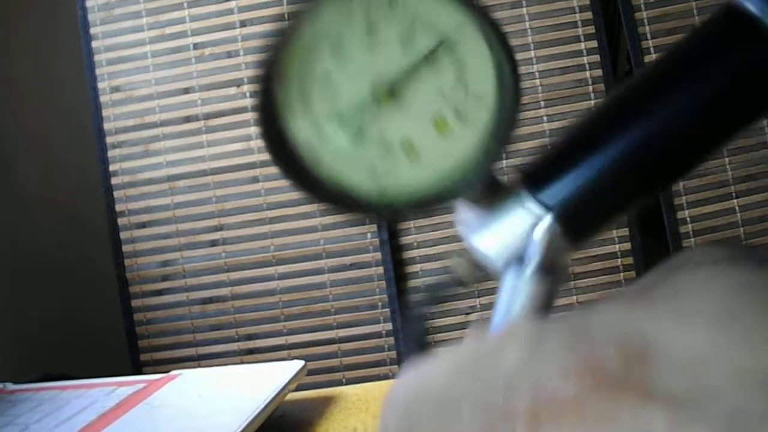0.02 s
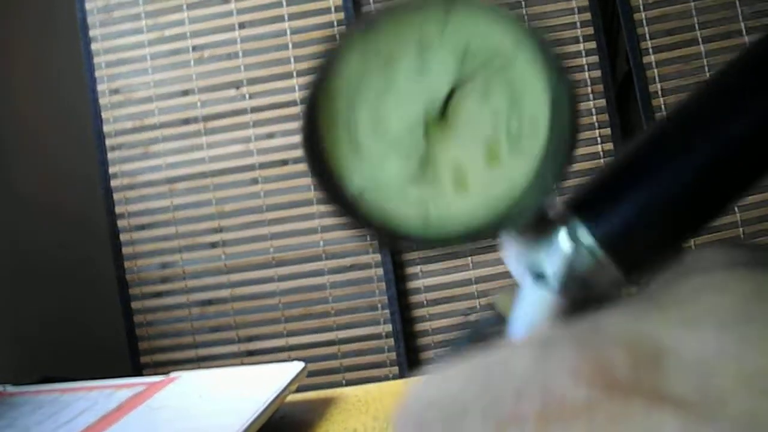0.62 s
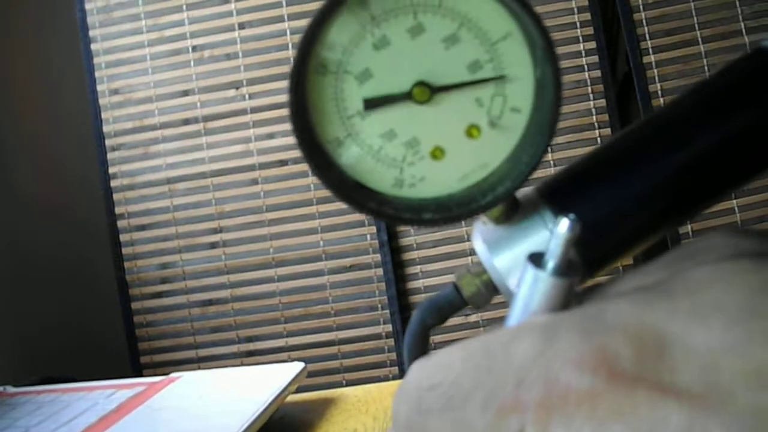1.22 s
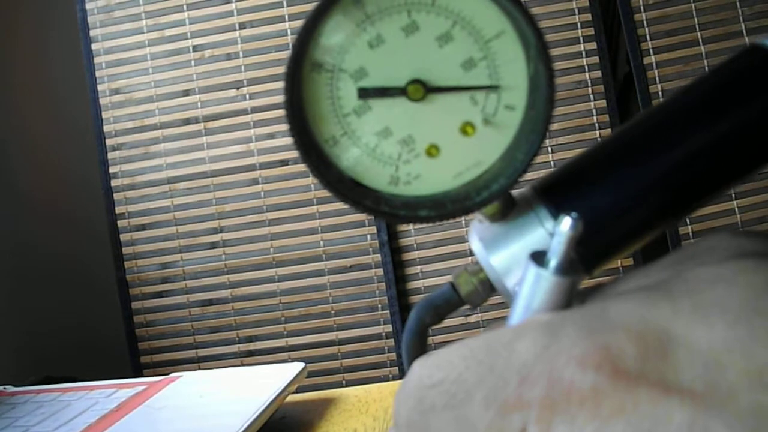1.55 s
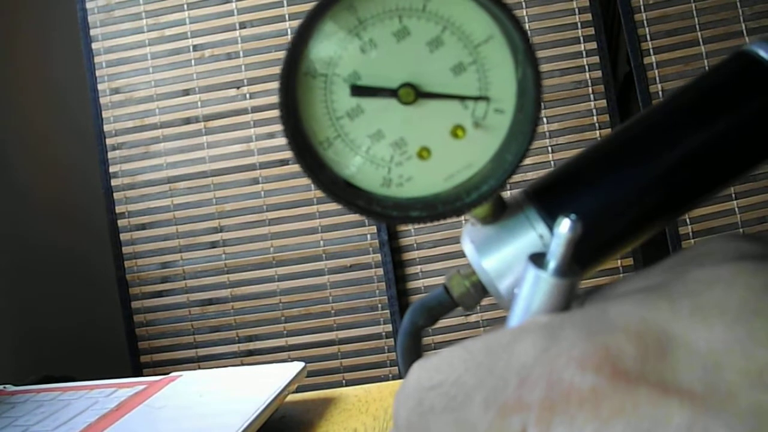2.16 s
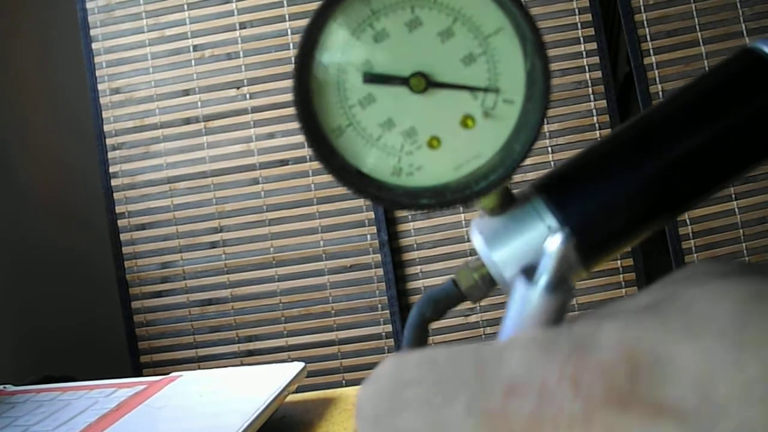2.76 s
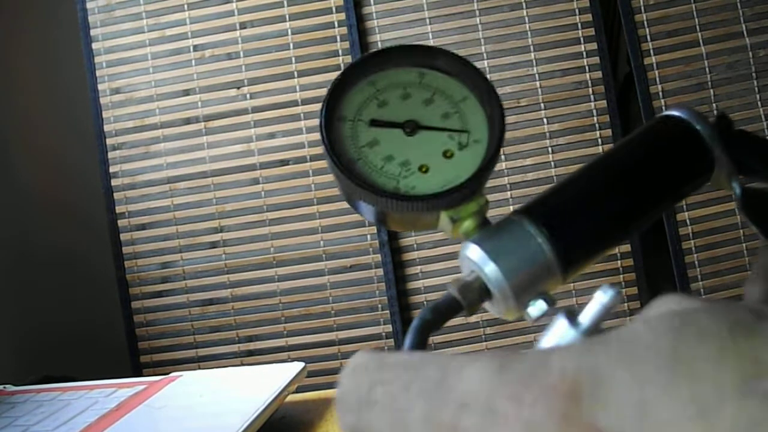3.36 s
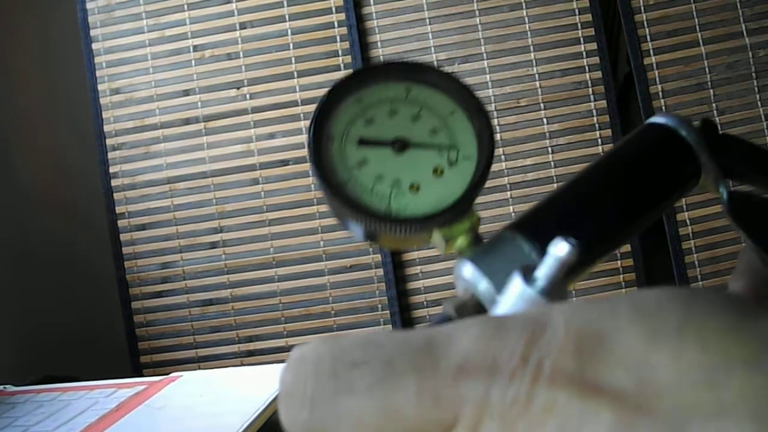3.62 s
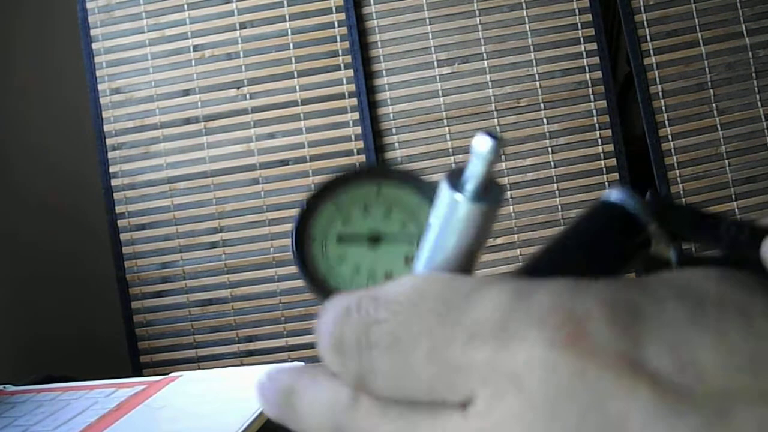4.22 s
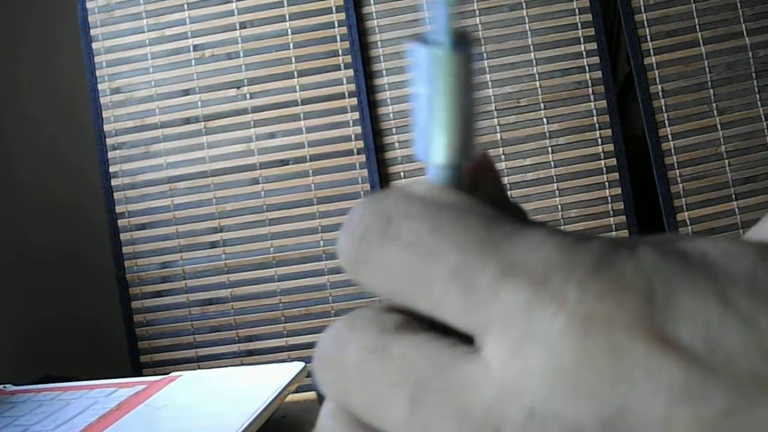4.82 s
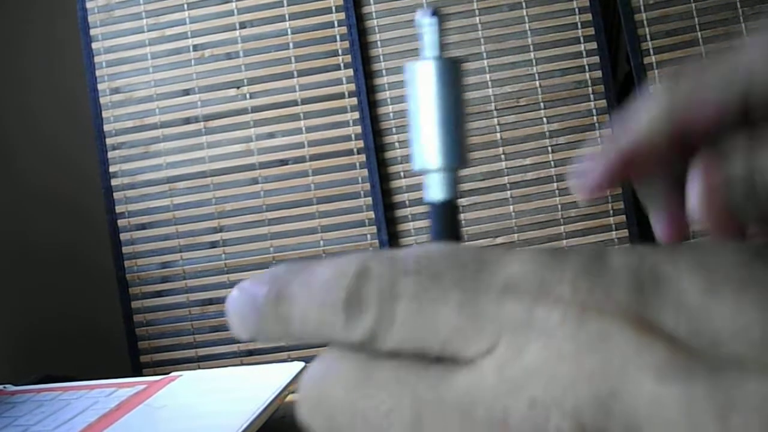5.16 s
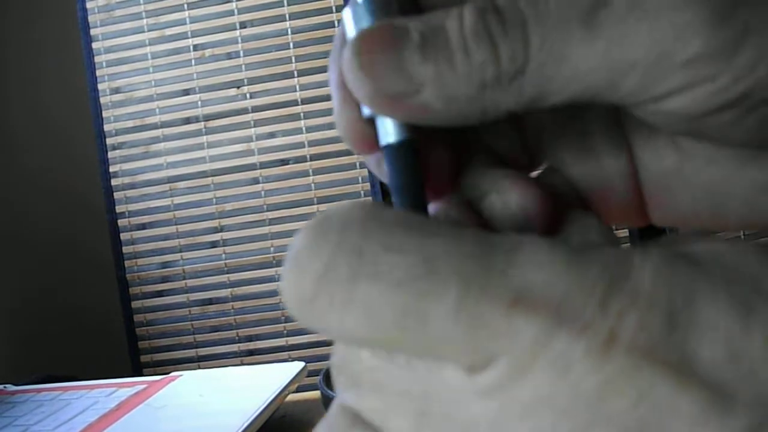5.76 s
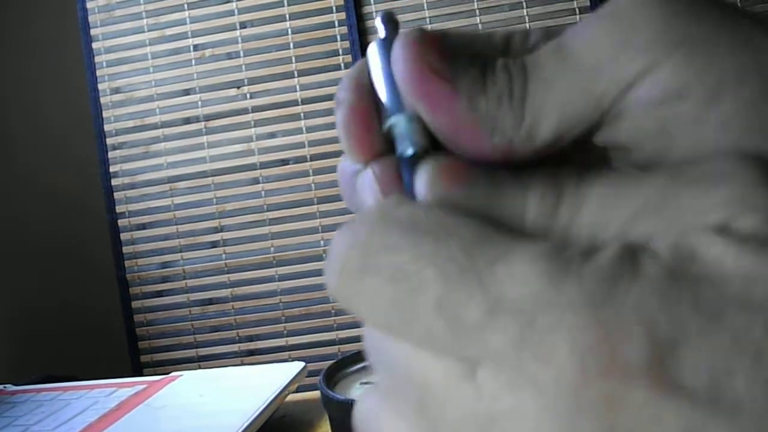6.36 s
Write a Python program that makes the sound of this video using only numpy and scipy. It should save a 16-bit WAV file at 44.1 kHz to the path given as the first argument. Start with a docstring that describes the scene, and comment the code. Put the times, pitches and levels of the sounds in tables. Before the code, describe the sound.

Four fast squelchy pump strokes with light knocks, a quiet gap, then a metal pump is set down and clatters over.

```python
"""A hand pump, worked and put down

A small pump makes four quick strokes in a quiet room. On each the seal rubs, the check valve chatters
and rings its air chamber, air spits past the seal and the piston knocks at the end of its travel;
between strokes the inlet valve chirps. Later hand and hose bump the desk and the pump is put down:
it clacks, rattles, tips over and rocks to rest, while the modes of its metal body ring on faintly."""
import sys
import numpy as np
from scipy import signal
from scipy.fft import rfft, irfft, next_fast_len
from scipy.io import wavfile
from scipy.ndimage import uniform_filter1d

SR = 44100
rng = np.random.default_rng(int(sys.argv[2]) if len(sys.argv) > 2 else 0)


def file_out(sig):
    """Save sig as 16-bit WAV at sys.argv[1]."""
    # one column per channel
    cols = np.atleast_2d(sig).T
    # limit, then scale
    lim = np.clip(cols, -1, 1)
    pcm = np.round(lim * 32767).astype(np.int16)
    wavfile.write(sys.argv[1], SR, pcm)


N = 291060

# check-valve chatter on each push: first_pop_s, spacing_s, pop_count, level_db, first_pitch_hz
STROKES = [(-.0071, 0.0078, 4, -11, 1095), (0.2142, 0.0084, 4, -12.5, 1079), (.491, .0084, 4, -12, 1076),
           (.737, 0.026, 3, -11.5, 1056)]
# the piston is pulled back: inlet_opens_s, back_stop_s, level_db
RETURNS = [(0.1025, 0.105, -14), (0.3624, 0.363, -17), (0.5985, 0.609, -12.5)]
# spectrum of the desk top's dense, short-lived modes: frequency_hz, density_db
DESK_SPECTRUM = [(100, -20), (300, 8.5), (600, -0.5), (1000, 5), (1400, -33), (3000, -49.5)]
# spectrum of rattling metal parts: frequency_hz, density_db
RATTLE_SPECTRUM = [(100, -4), (300, 4), (1000, -1), (1300, -6), (2000, -1.5), (3200, -5), (4200, -35.5),
                   (6000, -48)]


def amp(db):
    """Amplitude ratio of a level in decibels."""
    return 10 ** (np.asarray(db) / 20)


def unit_rms(x):
    """The signal normalised to an rms of 1."""
    return x / np.sqrt(np.mean(x ** 2) + 1e-20)


def curve_at(points, hz):
    """Interpolation of (frequency_hz, value) points on a logarithmic frequency axis."""
    frequencies, values = np.transpose(points)
    return np.interp(np.log(hz + 1), np.log(frequencies + 1), values)


def filtered(x, response):
    """Zero-phase filtering: the spectrum is multiplied by a gain that depends on frequency."""
    size = next_fast_len(len(x) + SR // 4)
    gain = response(np.fft.rfftfreq(size, 1 / SR))
    return irfft(rfft(x, size) * gain, size)[:len(x)]


def noise(spectrum, size):
    """White noise shaped to a spectrum, at an rms of 1."""
    return unit_rms(filtered(rng.standard_normal(size), lambda hz: amp(curve_at(spectrum, hz))))


def second():
    """One second of sample times."""
    return np.arange(SR) / SR


def mode(hz, t60_s):
    """Free vibration of a damped oscillator, falling 60 dB in t60_s."""
    t = second()
    return np.sin(2 * np.pi * hz * t) * amp(-60 * t / t60_s)


def struck(modes, scatter_db=1.5):
    """Modal superposition: each blow excites the modes at slightly different strengths."""
    return sum(amp(db + scatter_db * rng.standard_normal()) * mode(hz, t60) for hz, db, t60 in modes)


def cavity(hz, t60_s):
    """Resonance of an air cavity: the lighter the damping, the slower the build-up."""
    return mode(hz, t60_s) * (1 - np.exp(-second() / (0.056 * t60_s)))


def pulse(width_s):
    """A one-sided pressure pulse of height 1."""
    u = second() / width_s
    return u * np.exp(1 - u)


def onset(rise_s):
    """A rounded attack: an elastic contact takes time to build up force."""
    return 1 - np.exp(-(second() / rise_s) ** 2)


def until(end_s):
    """A gate that stays open until end_s, then closes in a millisecond."""
    return np.clip((end_s - second()) / .001 + 1, 0, 1)


def gaps(rows):
    """Seconds from each event to the next, or to the end of the scene."""
    return np.diff([row[0] for row in rows] + [N / SR])


def add(track, start_s, sound):
    """Superpose a sound on the track, trimming what falls outside it."""
    start = round(start_s * SR)
    sound = sound[max(-start, 0):]
    part = track[max(start, 0):][:len(sound)]
    part += sound[:len(part)]


def valve_pops(sag_hz_per_s=2900):
    """Periodic valve openings, sinking in pitch within a push: start_s, level_db, pitch_hz, t60_s."""
    # strength of successive pops, a shorter push using the end of the list: relative_db
    pop_levels = [0, -2.5, 2, -6]
    pops = []
    for first_s, spacing_s, count, db, hz in STROKES:
        for k, relative_db in enumerate(pop_levels[-round(count):]):
            elapsed_s = k * spacing_s
            t60_s = 0.04 if k else 0.02  # the chamber rings longer once the valve has lifted
            pops.append((first_s + elapsed_s, db + relative_db, hz - sag_hz_per_s * elapsed_s, t60_s))
    return pops


def background():
    """Stationary noise, microphone hiss over room rumble, with the pure tones of a faint hum."""
    # rumble and hiss: frequency_hz, density_db
    floor_spectrum = [(5, -20.5), (25, 5.5), (42, -3), (75, -5), (124, -10), (180, -10), (270, -12),
                      (383, -14), (954, -16), (1230, -18), (4370, -20), (5400, -25.5), (7000, -35)]
    # hum in the room: pitch_hz, rms_db
    hum_tones = [(43.1, -55), (120, -62), (240, -69)]
    t = np.arange(N) / SR
    hum = sum(amp(db) * np.sqrt(2) * np.sin(2 * np.pi * hz * t) for hz, db in hum_tones)
    return amp(-44) * noise(floor_spectrum, N) + hum


def seal_friction(rough_db=3, rise_s=0.011, fall_s=0.0093):
    """Sliding friction of seal on barrel: rough noise that swells into each valve opening and eases."""
    # the rubbing seal: frequency_hz, density_db
    rub_spectrum = [(100, 2.5), (300, 3.5), (700, 0), (1050, 3.5), (1550, -9.5), (2000, -22.5),
                    (4000, -18.5)]
    t, power = np.arange(N) / SR, np.zeros(N)
    openings = [(s, db) for s, db, _, _ in valve_pops()] + [(s, db + 3) for s, _, db in RETURNS]
    for open_s, db in openings:
        power += amp(0.68 * db) ** 2 * np.exp(np.minimum((t - open_s) / rise_s, (open_s - t) / fall_s))
    roughness = unit_rms(uniform_filter1d(rng.standard_normal(N), size=130))
    rub = amp(rough_db * roughness) * noise(rub_spectrum, N)
    return amp(-25.5) * np.sqrt(power) * unit_rms(rub)


def check_valve():
    """Cavity resonance: each pop releases a puff and rings the air chamber until the next takes over."""
    out, pops = np.zeros(N), valve_pops()
    puff = amp(-5) * pulse(width_s=0.00084) * onset(rise_s=0.00076)
    for (start_s, db, hz, t60_s), gap_s in zip(pops, gaps(pops)):
        chamber = amp(3) * cavity(hz, t60_s) * until(gap_s)
        add(out, start_s, -amp(db) * (chamber + puff))
    squeak = amp(-20.5) * cavity(hz=1480, t60_s=0.06)  # the seal, as a push begins
    reseat = amp(-18.5) * cavity(hz=1064, t60_s=0.054)  # the valve settles with a faint pop
    for first_s, _, _, db, _ in STROKES:
        add(out, first_s - 0.031, amp(db) * squeak)
        add(out, first_s + 0.055, amp(db) * reseat)
    return out


def air_jets(leak_hz=5360, leak_s=0.0081, spit_hz=4440, width_hz=650, t60_s=0.0074):
    """Turbulent jet noise at the seal: a thin leak before the valve lifts, a spit at full pressure."""
    # air spits past the seal: start_s, level_db, length_s
    spits = [(0.058, -16.5, .0057), (0.2819, -21, 0.0086), (0.557, -26.5, 0.0066), (0.784, -31, 0.0055)]
    # broad skirt around a jet's spectral peak: frequency_hz, density_db
    skirt = [(200, -10), (900, 10), (1700, -20.5), (2500, -3.5), (6000, -32.5)]
    out, t = np.zeros(N), second()
    leaks = [(first_s - 0.005, db - 22, leak_s, leak_hz) for first_s, _, _, db, _ in STROKES]
    for start_s, db, length_s, peak_hz in leaks + [(*spit, spit_hz) for spit in spits]:
        colour = lambda hz: 1 / (1 + ((hz - peak_hz) / width_hz) ** 2) + amp(-3.5 + curve_at(skirt, hz))
        jet = unit_rms(filtered(rng.standard_normal(SR), colour))
        envelope = amp(db - 60 * np.maximum(t - length_s, 0) / t60_s)
        add(out, start_s, envelope * jet)
    return out


def piston_knocks():
    """Impact at either stop excites heavily damped modes of the barrel and a slow shudder of the hand."""
    # the piston meets the end of the barrel: start_s, level_db
    end_stops = [(0.0601, -9.5), (0.293, -11), (0.559, -9.5), (0.8189, -9.5)]
    out = np.zeros(N)
    end_tone, back_tone = mode(hz=282, t60_s=0.028), mode(hz=235, t60_s=0.016)
    overtone = amp(-13) * mode(hz=840, t60_s=0.036)
    thump = amp(-10) * pulse(width_s=0.00053)
    shudder = amp(-15.5) * mode(hz=41.5, t60_s=0.048) + amp(-25.5) * mode(hz=140, t60_s=0.12)
    stops = [(s, db, end_tone) for s, db in end_stops] + [(s, db, back_tone) for _, s, db in RETURNS]
    for start_s, db, tone in stops:
        knock = (tone + overtone + thump + shudder) * onset(rise_s=0.00052)
        add(out, start_s, -amp(db) * knock)
    return out


def inlet_valve():
    """Cavity resonances chirp as the inlet valve opens on the return stroke."""
    # resonances of the inlet: pitch_hz, level_db, t60_s
    inlet_modes = [(926, 0, 0.027), (1442, -8.5, 0.03), (1540, -13, 0.059)]
    out = np.zeros(N)
    chirp = sum(amp(db) * cavity(hz, t60_s) for hz, db, t60_s in inlet_modes)
    for opens_s, _, db in RETURNS:
        add(out, opens_s, amp(db) * chirp)
    return out


def soft_bumps(decay_cycles=7.5):
    """Soft impacts stir the desk top; their tones share one damping ratio, so low ones last longer."""
    # hand and hose bump the pump and the desk: start_s, level_db, pitch_hz
    touches = [(3.588, -31, 650), (3.682, -33.5, 253), (3.854, -29.5, 880), (4.2505, -25, 745),
               (4.256, -23.5, 114), (4.3372, -26.5, 970), (4.36, -31, 130), (4.407, -28.5, 205),
               (5.48, -22, 566)]
    out = np.zeros(N)
    for start_s, db, hz in touches:
        bump = mode(hz, decay_cycles / hz) * onset(rise_s=0.00054)
        desk_top = amp(-12 - 60 * second() / 0.038) * noise(DESK_SPECTRUM, SR)
        add(out, start_s, amp(db) * (bump + desk_top))
    return out


def desk_clacks(land_s, decay_cycles=5.4, rattle_t60_s=0.016, desk_t60_s=0.065):
    """Stiff impacts shake loose parts and leave the desk and the metal body in free vibration."""
    # the pump meets the desk: start_s, level_db, contact_pitch_hz, relative_rattle_db
    clacks = [(4.5379, 0.5, 600, -19.5), (4.549, -17, 762, -26), (4.559, -14, 526, -37.5),
              (4.569, -21, 495, -30), (4.8222, 4, 1075, 1), (4.8777, 3, 682, -16), (4.907, -5, 660, -18),
              (4.921, -4, 720, -20)]
    # modes of the loose brass fitting: pitch_hz, level_db, t60_s
    fitting_modes = [(1942, -4.5, 0.02), (1045, -5, 0.018)]
    # modes of the desk: pitch_hz, level_db, t60_s
    desk_modes = [(64.7, 5, 0.66), (125.4, -11, 0.2), (241, -8, 0.2), (291.5, 9.5, 0.26), (528, 4, 0.08),
                  (637, -2, 0.17), (720, -5, 0.2)]
    # modes of the pump's metal body: pitch_hz, level_db, t60_s
    body_modes = [(258, -7, 1.0), (377, -18, 1.0), (797, 0, .62), (953, -13, .8), (1039, -10, 1.5),
                  (1184, -16, 1.2)]
    out, t = np.zeros(N), second()
    thud = amp(-9) * mode(hz=384, t60_s=0.011) + amp(-14) * pulse(width_s=0.0004)
    fitting = sum(amp(db) * mode(hz, t60_s) for hz, db, t60_s in fitting_modes)
    for (start_s, db, hz, rattle_db), gap_s in zip(clacks, gaps(clacks)):
        contact = (amp(5.5) * mode(hz, decay_cycles / hz) + thud) * onset(rise_s=0.00034)
        rattle = amp(-60 * t / rattle_t60_s) * noise(RATTLE_SPECTRUM, SR)
        loose_parts = amp(rattle_db) * (rattle + fitting)
        desk_ring = amp(-41.5) * struck(desk_modes)
        desk_top = amp(-22 - 60 * t / desk_t60_s) * noise(DESK_SPECTRUM, SR)
        desk = (desk_ring + desk_top) * onset(rise_s=0.0011)
        held_db = -8 if start_s < land_s else 0  # a hand mutes the body until it lands
        body = amp(-25 + held_db) * struck(body_modes) * until(gap_s)  # the next contact chokes it
        add(out, start_s, amp(db) * (contact + loose_parts + desk + body))
    return out


def tipping(tip_s, land_s, settle_s, contacts_per_s=1200):
    """Shot noise of tiny contacts swells as the pump tips over; the desk rumbles as it rocks to rest."""
    # the desk top under the rocking pump: frequency_hz, density_db
    rumble_spectrum = [(30, -20), (65, -2.5), (140, -7), (270, 3.5), (400, -7.5), (600, -10), (1000, -1),
                       (1400, -21), (3000, -56)]
    t = np.arange(N) / SR

    def swell(end_s, rise_db_per_s, fall_db_per_s):
        """Exponential growth up to the landing, and exponential decay after end_s."""
        db = -rise_db_per_s * np.maximum(land_s - t, 0) - fall_db_per_s * np.maximum(t - end_s, 0)
        return (t > tip_s) * amp(db)

    contacts = (rng.random(N) < contacts_per_s / SR) * rng.standard_normal(N)
    chatter = unit_rms(filtered(contacts, lambda hz: amp(curve_at(RATTLE_SPECTRUM, hz))))
    scraping = amp(-21) * swell(land_s, rise_db_per_s=498, fall_db_per_s=1496)
    rocking = amp(-25.5) * swell(settle_s, rise_db_per_s=377, fall_db_per_s=234)
    return (scraping + amp(-11.5) * rocking) * chatter + rocking * noise(rumble_spectrum, N)


def room(x, wet_db, build_s):
    """Reverberation: direct sound plus its convolution with a diffuse tail whose bass lasts longest."""
    # reverberation time of the small room: frequency_hz, t60_s
    decay_times = [(100, 0.44), (400, 0.24), (1000, 0.19), (3000, 0.16), (6000, 0.17)]
    hz, t, spectra = signal.stft(rng.standard_normal(SR // 2), SR, nperseg=256)
    decay = amp(-60 * t / curve_at(decay_times, hz)[:, None])
    tail = signal.istft(spectra * decay, SR, nperseg=256)[1]
    tail *= onset(build_s)[:len(tail)]
    return x + amp(wet_db) * signal.fftconvolve(x, tail / np.linalg.norm(tail))[:N]


def scene():
    """Superposition of pumping and handling, each with its reverberation, over the background."""
    land_s = 4.875  # the pump lands on its side
    pumping = room(check_valve() + inlet_valve() + seal_friction(), wet_db=-14, build_s=0.0022)
    pumping += room(piston_knocks(), wet_db=-11, build_s=0.0014)
    pumping += room(air_jets(), wet_db=-10, build_s=0.0017)
    handling = desk_clacks(land_s) + tipping(tip_s=4.825, land_s=land_s, settle_s=4.93) + soft_bumps()
    return (pumping + room(handling, wet_db=-18, build_s=0.015) + background())[None]


def record(dry, knee=6, ceiling=0.71, band_hz=5575, clip_level=0.715, top_hz=16000):
    """Saturation: the microphone flattens the hardest clacks; its low-passed output clips on overshoot."""
    saturated = dry[0] / (1 + np.abs(dry[0] / ceiling) ** knee) ** (1 / knee)
    narrow = filtered(saturated, lambda hz: 1 / np.hypot(1, (hz / band_hz) ** 30))
    clipped = np.clip(narrow, -clip_level, clip_level)
    return filtered(clipped, lambda hz: hz < top_hz)[None]


dry = scene()
out = record(dry)
file_out(out)
```